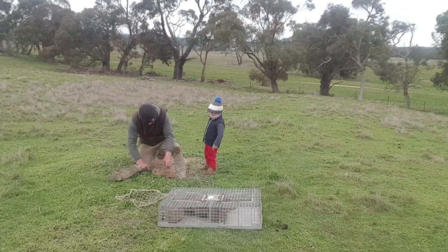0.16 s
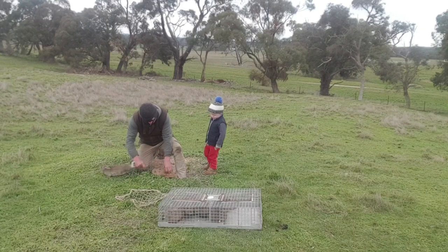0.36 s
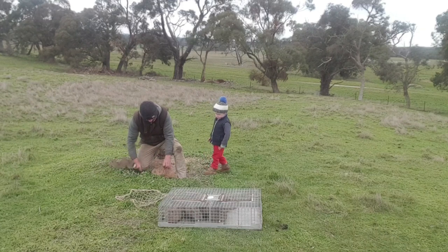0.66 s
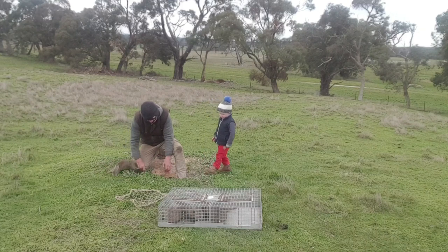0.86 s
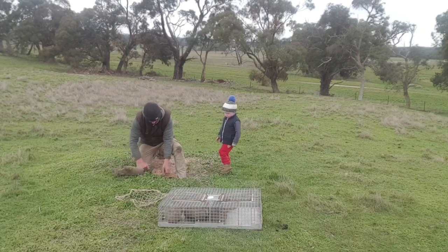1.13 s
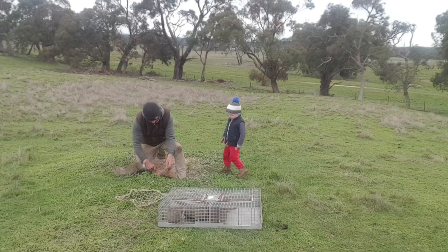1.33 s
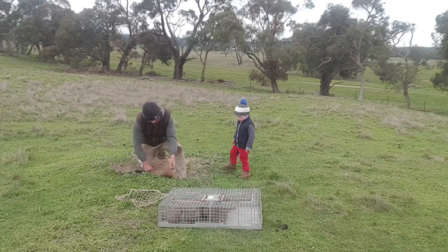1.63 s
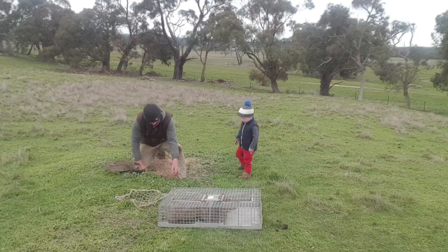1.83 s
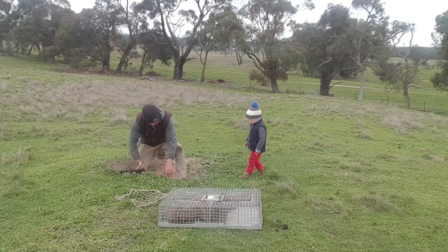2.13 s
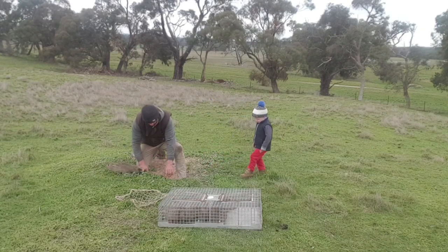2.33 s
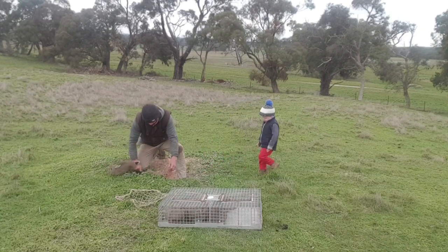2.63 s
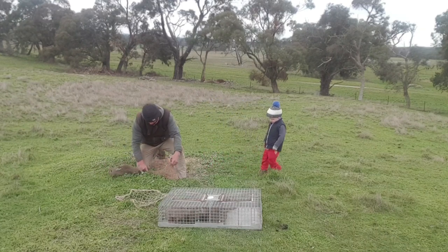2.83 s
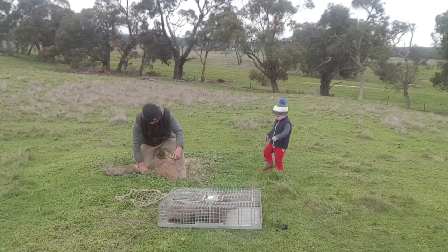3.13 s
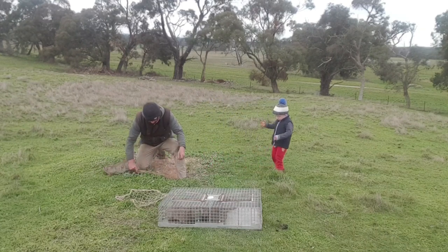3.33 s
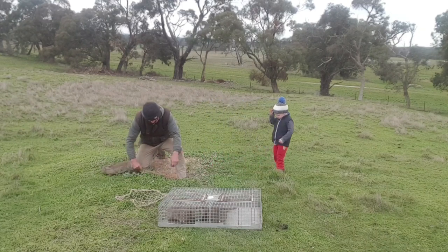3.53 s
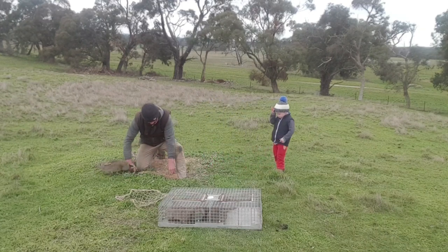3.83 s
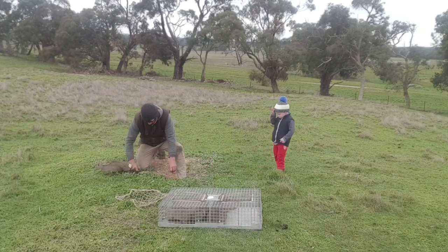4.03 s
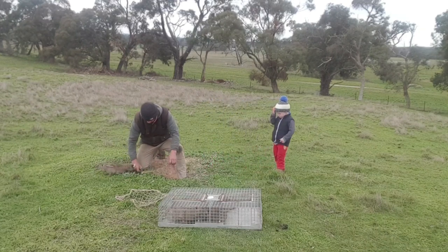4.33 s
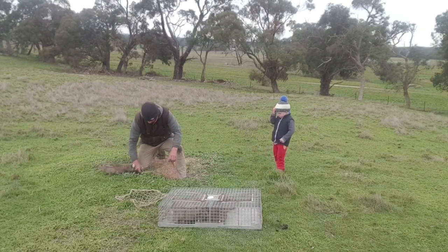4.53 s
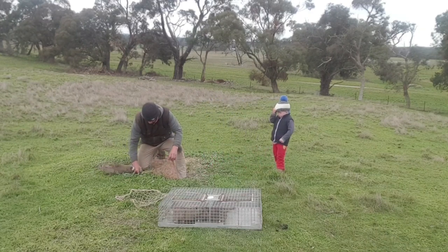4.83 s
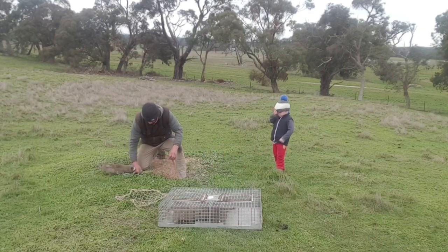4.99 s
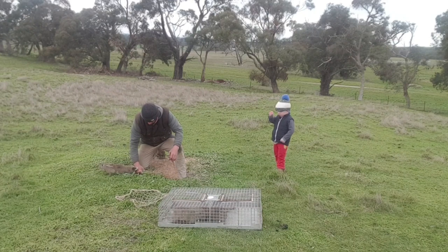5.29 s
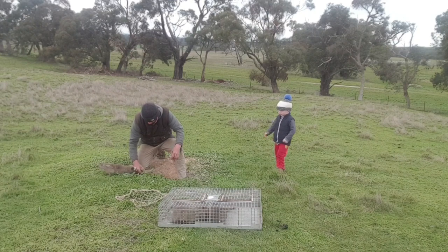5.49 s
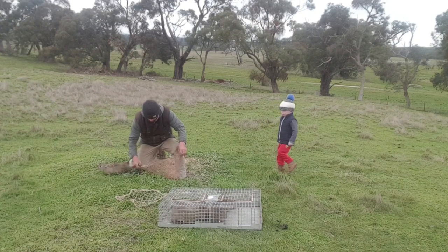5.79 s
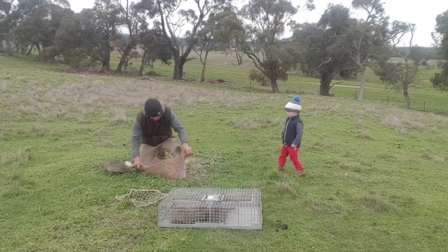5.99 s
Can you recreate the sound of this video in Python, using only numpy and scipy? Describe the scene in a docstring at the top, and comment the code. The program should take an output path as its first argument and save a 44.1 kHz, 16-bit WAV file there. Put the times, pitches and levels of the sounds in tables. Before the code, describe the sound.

A distressed small animal squeals over and over, high and piercing, first in quick short cries, then in longer ones nearly half a second each. Clear bending whistles fray into rough, airy screeching. Light low wind and faint hiss run throughout. The last cry stops before five seconds, leaving breeze and tiny cloth-on-grass brushes. Outdoor stereo pickup at modest distance, voice near the centre, with very faint echoes from grass and trees.

```python
"""From the first moment a light breeze rumbles under hiss in an open field, as noise shaped by frequency and time.
A small animal, probably a rabbit, handled on a sack, squeals again and again: each squeal scoops up as a bending
whistle of harmonics, and breaks turn it into a screech of puffed noise as the folds lose their rhythm.
Grass and far trees return faint tails of scattered reflections after each squeal.
Sacking and grass rustle once early on and mostly near and after the last squeals, as short bursts of grainy noise."""
import sys
import numpy as np
from scipy import signal
from scipy.fft import rfft, irfft, next_fast_len
from scipy.io import wavfile
from scipy.ndimage import uniform_filter1d

SR = 44100
rng = np.random.default_rng(int(sys.argv[2]) if len(sys.argv) > 2 else 0)


def master(y):
    """Save y as 16-bit WAV."""
    cut = np.clip(np.atleast_2d(y).T, -1, 1)
    pcm = np.round(cut * 32767)  # scale
    wavfile.write(sys.argv[1], SR, pcm.astype(np.int16))


N = 271215
TIME = np.arange(N) / SR  # s

# One row per squeal; strain lifts the overtones, an open mouth lifts the treble:
# start_s, release_s, top_pitch_hz, scoop_from_below_hz, scoop_time_s, level_db, swell_start_to_release_db,
# strain_db, mouth_db
SQUEALS = [(-.02, .022, 2300, 850, .055, -37, 0.5, -15, 13), (0.027, .355, 2556, 560, .095, -25, -1, 9, -1),
           (.372, .582, 2430, 600, .047, -28.5, -4, 4.5, 3.5), (.59, .618, 2294, 0, .05, -36, 0.5, 0.5, -4),
           (.75, 1.193, 2488, 625, .045, -26.5, -7.5, -1, 2),
           (1.346, 1.677, 2477, 725, .033, -23, -4, 13.5, -1),
           (2.049, 2.53, 2423, 98, .066, -25, 1.5, -1, 0),
           (2.703, 3.168, 2445, 854.5, .033, -26.5, -7.5, 9, 2),
           (3.28, 3.692, 2497, 742.5, .091, -28, 0.5, -4, 9),
           (3.905, 4.292, 2415, 657.5, .06, -24.5, -0.5, 2, -7),
           (4.488, 4.815, 2412, 677.5, .095, -22.5, -1.5, 9, -6)]
# The voice falters, and pitch, level and treble dip together: time_s, depth_hz, half_length_s
FALTERS = [(0.294, 315.5, 0.027), (.47, 402, 0.025), (0.519, 239.3, 0.013), (0.841, 220.3, 0.021),
           (0.94, 423, 0.04), (1.11, 416, 0.04), (1.402, 178.2, 0.03), (1.489, 309.5, .022),
           (1.556, 200, .013), (2.077, 208, .014), (2.148, 81.4, .012), (4.044, 184.4, .038),
           (4.657, 204.6, 0.025)]
# The voice breaks into a screech:
# start_s, end_s, roughness (a share, later limited), extra_level_db, extra_strain_db, extra_mouth_db
BREAKS = [(-.03, .046, .85, 3, -0.5, 1.5), (.069, .272, 1.08, -.5, -11, 13), (0.387, .447, 0.87, 0, 8, 5.5),
          (.447, .497, .22, 0, 3, -3), (0.604, .66, 0.79, -1, -2, -1.5), (.856, .894, 1, 0, 11.5, 1.5),
          (.973, 1.088, 1.1, -3.5, -5, 5), (1.52, 1.568, 0.76, -4, -8, 9),
          (1.568, 1.75, .64, -3.5, -10, -3), (2.176, 2.6, .87, -.5, 4.5, -1.5),
          (2.786, 2.963, .62, -1.5, -2, -0.5), (2.96, 3.23, .98, -1.5, -16.5, 7.5),
          (3.411, 3.77, .9, -.5, -3, 1), (4.105, 4.165, .45, -0.5, -7, -3.5),
          (4.165, 4.37, .82, 0, 0, -2.5), (4.69, 4.725, .45, 0, -8, 2), (4.725, 4.89, .9, -1.5, -6, -1.5)]
# The voice narrows into a piercing shriek: time_s, extra_level_db
SHRIEKS = [(.086, 4.5), (.22, 8), (.413, 9.5), (.873, 2), (1.43, 2), (1.515, 2.5), (1.553, 2), (2.526, 0),
           (3.164, 2.5), (3.675, 1)]
# Relative strengths of the clean voice's harmonics, from the first up: level_db
HARMONICS_DB = [-5, 0.5, -6.5, -24.5, -22, -30.5]
# Throat colour of the screech: frequency_hz, relative_density_db (per Hz)
THROAT_COLOUR = [(700, -53.5), (1050, -84.5), (1500, -19.5), (1950, -13), (2350, -6.5), (3200, -14),
                 (4200, 4), (5100, -1), (6300, -7), (7200, -5.5), (9000, -22.5), (10500, -18.5),
                 (12700, -17), (14500, -52.5)]
# The voice at the microphones: frequency_hz, left_minus_right_db
VOICE_BALANCE = [(2200, 0), (4500, 2.15), (7000, 1.75), (10000, 3.5)]
# Diffuse sound relative to the straight path: frequency_hz, scatter_db
SCATTER = [(2000, -27.5), (4500, -9), (7000, -13.5), (10000, -0.5)]
# Brushes of sacking and grass: peak_s, level_db, treble_lift_db
RUSTLES = [(1.851, -63, 10), (4.357, -56, 3), (4.43, -50, 2), (5.09, -62.5, 3), (5.288, -66, 7),
           (5.354, -70, -1), (5.57, -66, -11)]
# Colour of the brushed sacking: frequency_hz, relative_density_db (per Hz)
SACKING_COLOUR = [(300, 0.5), (900, -3.5), (2200, 1), (3200, -12.5), (4500, -13.5), (7000, -10),
                  (14000, -36)]
# Breeze and distant hiss: frequency_hz, relative_density_db (per Hz)
FIELD_COLOUR = [(15, -46), (25, -12.5), (70, 0.5), (129, -5.5), (173, -12.5), (213, -6.5), (436, -23.5),
                (741, -24.5), (1870, -41), (2030, -35.5), (6850, -34.5), (8470, -47), (14000, -36.5)]
# Coherence of the field sound: frequency_hz, left_right_likeness (1 is identical)
FIELD_LIKENESS = [(40, 1), (300, 0.62), (2000, 0.044), (8000, 0.053)]
# Stereo balance of the field sound: frequency_hz, left_minus_right_db
FIELD_BALANCE = [(60, -9.5), (250, -3.5), (2000, 2.5)]
# Background level, relative to its mean: time_s, level_db
BACKGROUND_LEVEL = [(0, 2.5), (.75, 4.5), (1.25, -2), (2, -1), (2.9, -2), (3.7, 1), (4.3, .5), (6.1, -1.5)]

SHRIEK_S = 0.028  # half length of a shriek
ATTACK_S, ATTACK_DB, RELEASE_DB_PER_S = .031, 23, 700
SAG_HZ, SAG_S = 269.1, .04  # pitch lost at the release, and its time constant, as the air runs out
LEVEL_DB_PER_HZ, MOUTH_DB_PER_HZ = .015, .01  # lost for each Hz that the voice is slack
BAND_LIMIT_HZ = 14300


def squeals(tremble_db=0.3, shriek_db=7, shriek_hz=6300, width_hz=600, shriek_strain_db=3, torn_db=2.0):
    """Source-filter principle: the mouth and throat shape the folds' spectrum, while effort sets the level."""
    pitch_hz, level_db, strain_db, mouth_db = gesture()
    hz, t, spectrum = signal.stft(folds(pitch_hz), SR, nperseg=256)
    overtone_weight = read([(2800, 0), (3700, 0.98)], hz)[:, None]
    treble_weight = read([(5000, 0.15), (6500, 0.9), (7800, 0.88), (11000, 0.73)], hz)[:, None]
    shrieking = np.interp(t, TIME, sum(bump(at, SHRIEK_S) for at, _ in SHRIEKS))

    shape_db = overtone_weight * (np.interp(t, TIME, strain_db) + shriek_strain_db * shrieking)
    shape_db = shape_db + treble_weight * np.interp(t, TIME, mouth_db)
    shriek_peak = np.exp(-.5 * ((hz - shriek_hz) / width_hz) ** 2)
    shape_db = shape_db + shriek_db * np.outer(shriek_peak, shrieking)
    # The straining throat keeps shifting its resonances
    shape_db = shape_db + torn_db * patches(spectrum.shape)

    voice = signal.istft(spectrum * amp(shape_db), SR, nperseg=256)[1][:N]
    # Short-time levelling leaves the loudness to the effort alone
    voice /= np.sqrt(uniform_filter1d(voice ** 2, size=900) + 1e-12)
    level_db = level_db + sum(db * bump(at, SHRIEK_S) for at, db in SHRIEKS)
    sounding = np.clip((level_db + 58) / 5, 0, 1)  # below a least pressure the folds stop
    return voice * amp(level_db + tremble_db * wander(55)) * sounding


def folds(pitch_hz, quiver=.003, jitter=.012, shimmer=0.75, puffing=0.53, waver=.012, least_shake=.09):
    """Periodic vibration gives harmonics; as roughness grows they shake and yield to pulsed turbulence."""
    rough = roughness()
    shake = np.maximum(rough, least_shake)
    drift = quiver * wander(55) + jitter * shake * wander(200) + waver * rough * wander(24)
    phase = 2 * np.pi * np.cumsum(pitch_hz * (1 + drift)) / SR
    tone = np.zeros(N)
    for k, db in enumerate(HARMONICS_DB, 1):
        tone += amp(db) * (1 + shimmer * shake * wander(160)) * np.cos(k * phase)
    puffs = rng.standard_normal(N) * (1 + puffing * np.cos(phase))
    screech = evened(colour(puffs, THROAT_COLOUR))
    return np.sqrt(1 - rough ** 2) * evened(tone) + rough * screech


def roughness(airy=0.03, unsteady=.09, steady_db=-39, faint_range_db=14, faint_rough=.7):
    """Irregular vibration: the voice tips unevenly in and out of chaos, frays when faint and always leaks air."""
    fraying = faint_rough * np.clip((steady_db - gesture()[1]) / faint_range_db, 0, 1)
    rough = np.hypot(np.maximum(breaking()[0], airy), fraying)
    return np.clip(rough * (1 + unsteady * wander(32)), 0, .98)


def gesture():
    """Fold tension sets pitch: a squeal scoops up, falters and sags; a slack voice is lower, softer, duller."""
    rows = np.array(SQUEALS)
    current = np.maximum(np.searchsorted(rows[:, 0], TIME) - 1, 0)
    start, release, top_hz, scoop_hz, scoop_s, level_db, swell_db, strain_db, mouth_db = rows[current].T
    since, past = TIME - start, TIME - release

    falter_hz = sum(depth * bump(at, half_s) for at, depth, half_s in FALTERS)
    slack_hz = scoop_hz * np.exp(-since / scoop_s) + falter_hz
    pitch_hz = top_hz - slack_hz - SAG_HZ * np.exp(np.minimum(past / SAG_S, .5))

    attack_db = ATTACK_DB * np.maximum(1 - since / ATTACK_S, 0)
    hold_db = level_db + swell_db * (np.minimum(since / (release - start), 1) - .5)
    release_db = RELEASE_DB_PER_S * np.maximum(past, 0)
    _, extra_db, extra_strain_db, extra_mouth_db = breaking()
    effort_db = hold_db - attack_db - release_db + extra_db - LEVEL_DB_PER_HZ * slack_hz
    effort_db = np.maximum(effort_db, -62)

    strain_db = strain_db + extra_strain_db
    mouth_db = mouth_db + extra_mouth_db - MOUTH_DB_PER_HZ * slack_hz
    controls = np.array([pitch_hz, effort_db, strain_db, mouth_db])
    return uniform_filter1d(controls, size=300, axis=1)  # muscles cannot jump


def breaking(edge_s=.026):
    """Register breaks: roughness, level, strain and mouth changes over time, with linear edges."""
    rows = np.array(BREAKS)
    inside = np.minimum(TIME - rows[:, :1], rows[:, 1:2] - TIME)
    return rows[:, 2:].T @ np.clip(.5 + inside / edge_s, 0, 1)


def bump(at, half_s):
    """Gaussian envelope: a smooth rise and fall of height 1."""
    return np.exp(-((TIME - at) / half_s) ** 2)


def place(x, lag_s=0.00011, grass_db=-20, trees_db=-45, least_scatter=.07):
    """Arrival-time difference: sound meets the right microphone first, partly diffuse, with grass and tree echoes."""
    hz = np.fft.rfftfreq(N, 1 / SR)
    delayed = irfft(rfft(x) * np.exp(-2j * np.pi * hz * lag_s), N)
    direct = np.array([delayed, x])
    scattered = diffused(x * np.sqrt(np.maximum(roughness(), least_scatter)))
    near = direct + colour(scattered, SCATTER)
    # What scatters is lost to the straight path
    near = irfft(rfft(near) / np.sqrt(1 + amp(read(SCATTER, hz)) ** 2), N)
    grass = amp(grass_db) * echoes(x, t60=0.023, start_s=0.0025)
    trees = amp(trees_db) * echoes(diffused(x)[0], t60=.9, start_s=.05)
    lean = amp(np.outer([1, -1], read(VOICE_BALANCE, hz)) / 2)
    return irfft(rfft(near + grass + trees) * lean, N)


def diffused(x):
    """Diffuse field: scrambled phases, different at each microphone, keep the sound's overall level."""
    spectrum = signal.stft(x, nperseg=256)[2]
    spectrum = spectrum * np.exp(2j * np.pi * rng.random((2, *spectrum.shape)))
    return x.std() * evened(signal.istft(spectrum, nperseg=256)[1][:, :N])


def echoes(x, t60, start_s):
    """Exponential decay: a dying spray of reflections, different at each microphone, falls 60 dB in t60 seconds."""
    t = TIME[:SR]
    tail = rng.standard_normal((2, SR)) * amp(-60 * t / t60) * (t > start_s)
    tail /= np.linalg.norm(tail, axis=1, keepdims=True)
    return signal.fftconvolve(x[None], tail, axes=1)[:, :N]


def rustles(grain_db=3, half_s=0.021):
    """Frictional noise: cloth brushing on grass gives short, grainy bursts."""
    out = np.zeros((2, N))
    grains = colour(rng.standard_normal((2, N)) * amp(grain_db * wander(130)), SACKING_COLOUR)
    for peak_s, level_db, treble_db in RUSTLES:
        near = abs(TIME - peak_s) < .1
        brush = evened(colour(grains[:, near], [(2500, 0.0015), (5000, treble_db)]))
        envelope = np.exp(-.5 * ((TIME[near] - peak_s) / half_s) ** 2)
        out[:, near] += amp(level_db) * brush * envelope
    return out


def field(level_db=-55.3, patchy_db=2, swing_db=2.0):
    """Partly coherent noise: a lumpy bass breeze, alike at both microphones, under a smoother, wide hiss."""
    frames, hz = N // 512 + 5, np.fft.rfftfreq(2048, 1 / SR)
    a, b, c, d = rng.standard_normal((4, frames, len(hz)))
    left, other = a + 1j * b, c + 1j * d
    likeness = np.clip(read(FIELD_LIKENESS, hz), -1, 1)
    right = likeness * left + np.sqrt(1 - likeness ** 2) * other
    lean = amp(read(FIELD_BALANCE, hz) / 2)
    spectrum = np.array([left * lean, right / lean])

    background_db = np.interp(TIME, *np.transpose(BACKGROUND_LEVEL))
    swings_db = background_db - background_db.mean() + swing_db * wander(20.97)
    swings_db = np.interp(np.linspace(0, TIME[-1], frames), TIME, swings_db)[:, None]
    liveliness = read([(200, 1), (1500, 0.56)], hz)  # the bass level moves most
    spectrum *= amp(read(FIELD_COLOUR, hz) + liveliness * (patchy_db * patches(a.shape) + swings_db))
    sound = signal.istft(spectrum.swapaxes(1, 2), nperseg=2048, noverlap=1536)[1][:, :N]
    return amp(level_db) * evened(sound)


def patches(shape):
    """Smoothed randomness: hills and hollows of rms 1 over time and frequency."""
    smooth = uniform_filter1d(rng.standard_normal(shape), size=9, axis=0)
    return evened(uniform_filter1d(smooth, size=7, axis=1))


def wander(rate_hz):
    """Low-passed randomness: smooth chance of rms 1 that moves up to about rate_hz."""
    size = next_fast_len(N, True)
    f = np.fft.rfftfreq(size, 1 / SR)
    spectrum = rfft(rng.standard_normal(size)) * np.exp(-.5 * (f / rate_hz) ** 2)
    return evened(irfft(spectrum, size)[:N])


def colour(x, points):
    """Linear filtering: multiplies the spectrum of x by a response in dB."""
    hz = np.fft.rfftfreq(x.shape[-1], 1 / SR)
    return irfft(rfft(x) * amp(read(points, hz)), x.shape[-1])


def read(points, hz):
    """Logarithmic frequency scale: joins the points of a spectrum by straight lines."""
    f, value = np.transpose(points)
    return np.interp(np.log(hz + 1), np.log(f + 1), value)


def amp(db):
    """Decibel law: turns decibels into amplitude gain."""
    return 10 ** (np.asarray(db) / 20)


def evened(x):
    """Mean power: scales x to rms 1."""
    return x / np.sqrt(np.mean(x ** 2) + 1e-20)


def scene():
    """Superposition: the animal's voice, the rustles and the field add up."""
    return place(squeals()) + rustles() + field()


def record(dry):
    """Band limitation: the recorder passes only what lies below its upper edge."""
    lowpass = signal.firwin(511, BAND_LIMIT_HZ, window=("kaiser", 9), fs=SR)
    return signal.oaconvolve(dry, lowpass[None], "same")


dry = scene()
out = record(dry)
master(out)
```